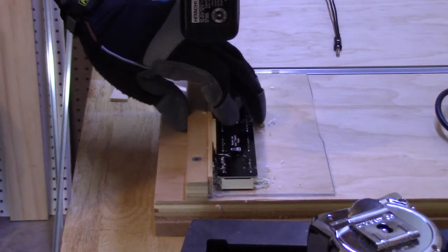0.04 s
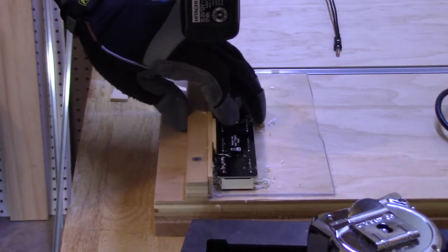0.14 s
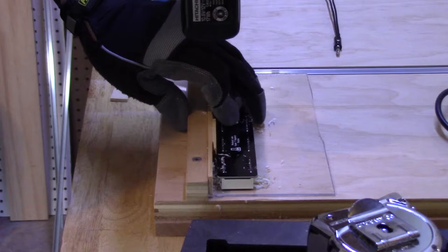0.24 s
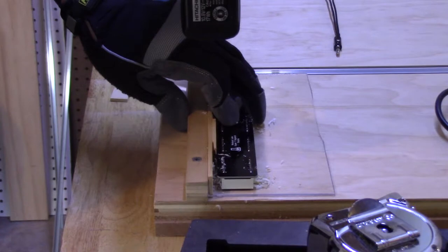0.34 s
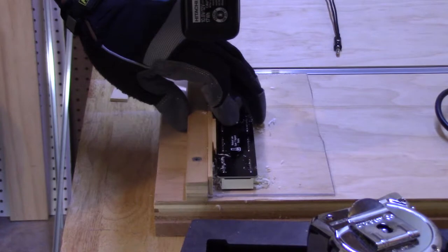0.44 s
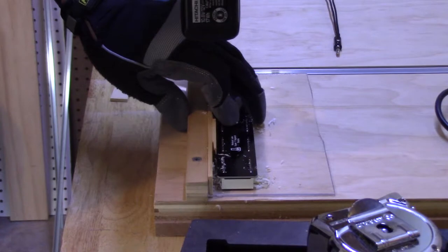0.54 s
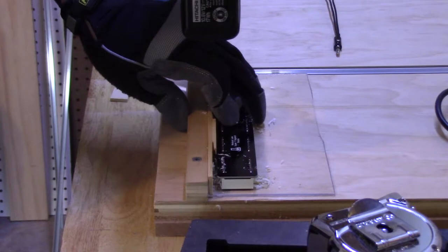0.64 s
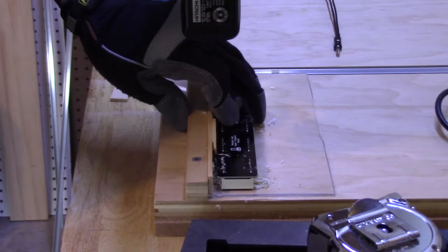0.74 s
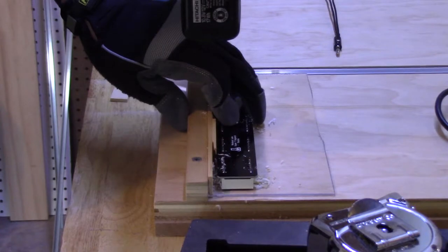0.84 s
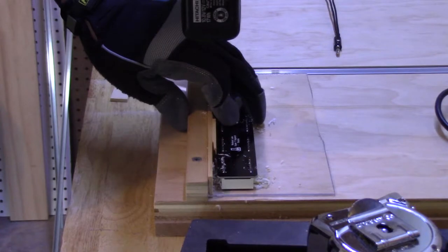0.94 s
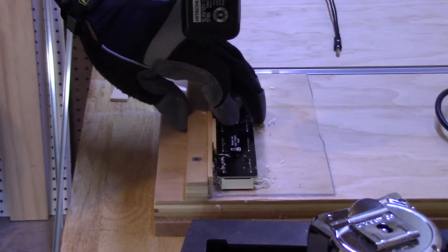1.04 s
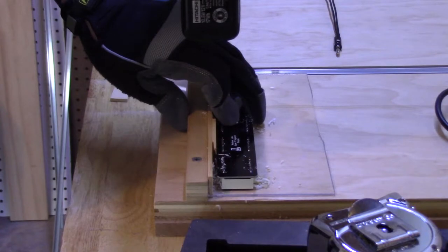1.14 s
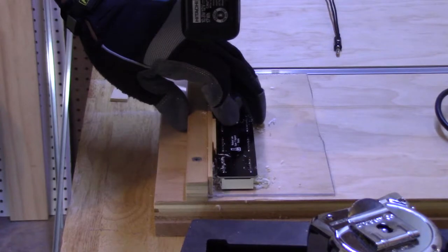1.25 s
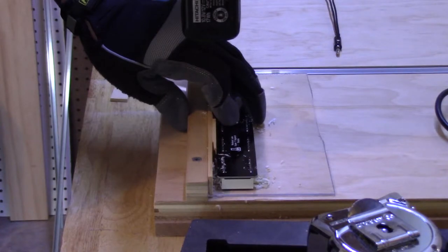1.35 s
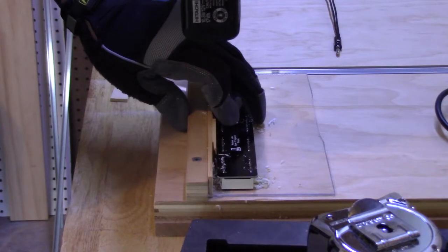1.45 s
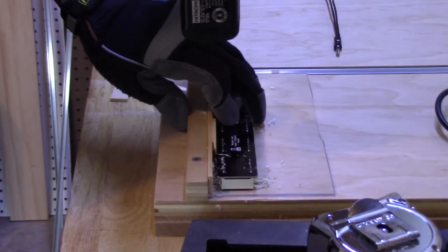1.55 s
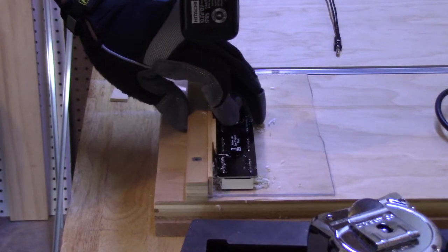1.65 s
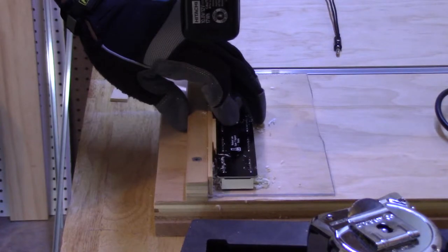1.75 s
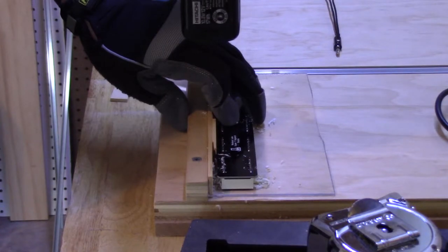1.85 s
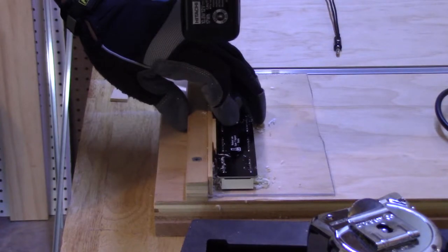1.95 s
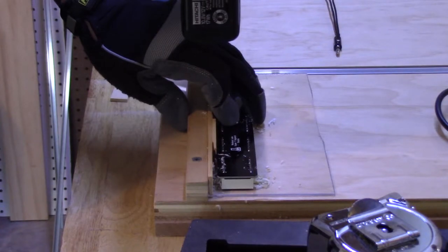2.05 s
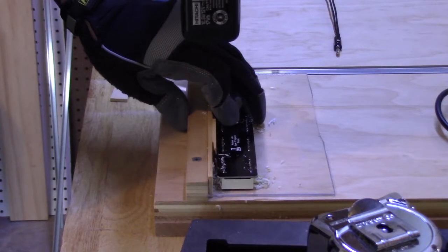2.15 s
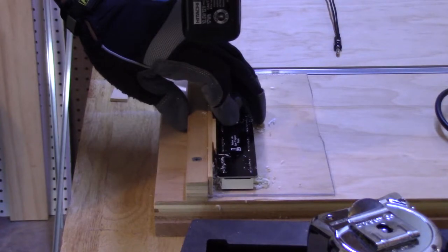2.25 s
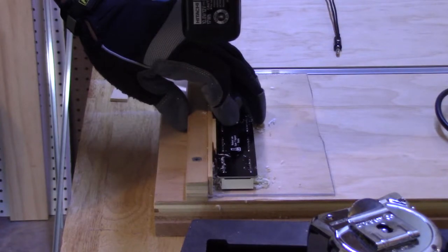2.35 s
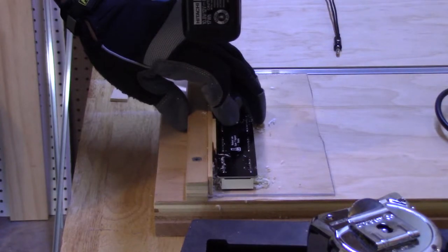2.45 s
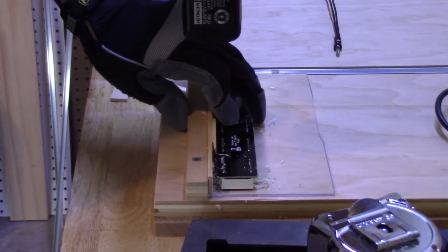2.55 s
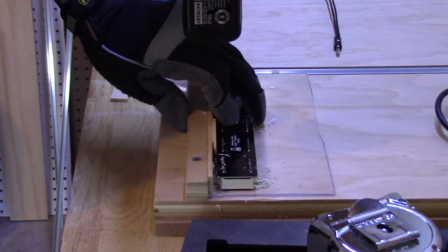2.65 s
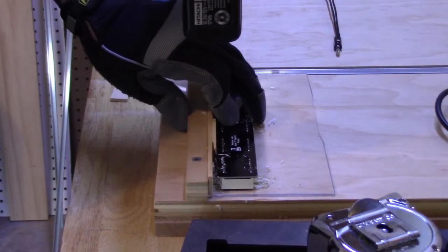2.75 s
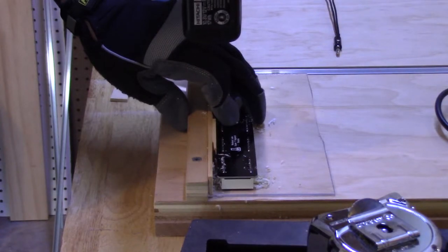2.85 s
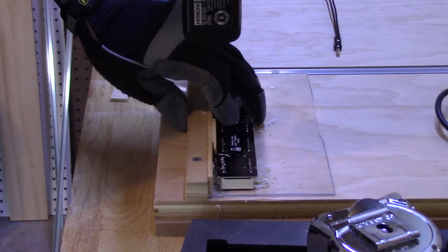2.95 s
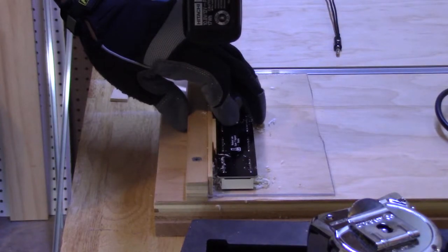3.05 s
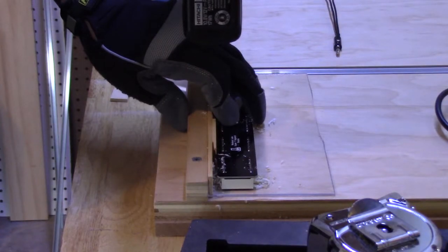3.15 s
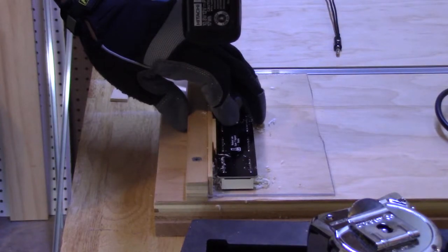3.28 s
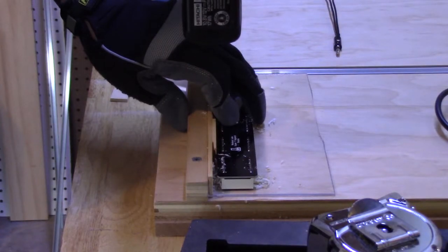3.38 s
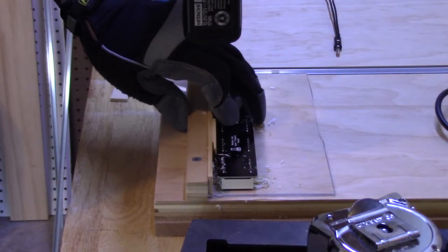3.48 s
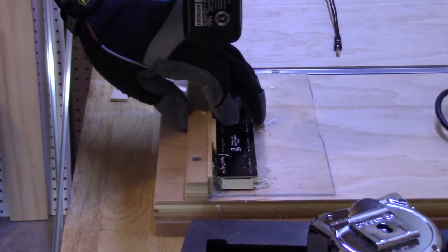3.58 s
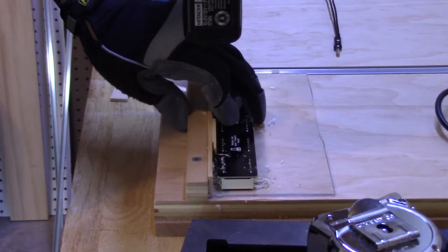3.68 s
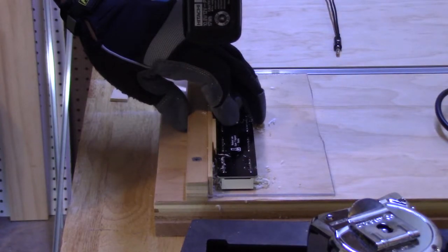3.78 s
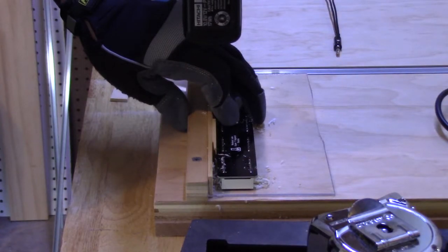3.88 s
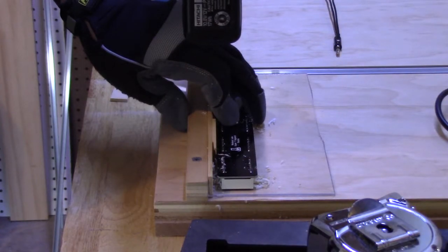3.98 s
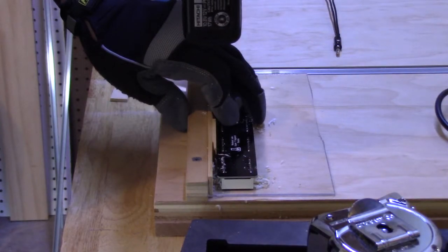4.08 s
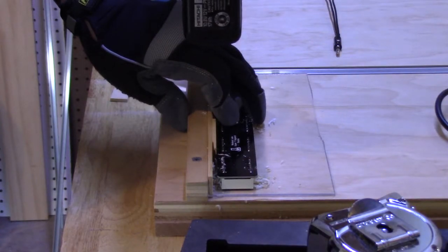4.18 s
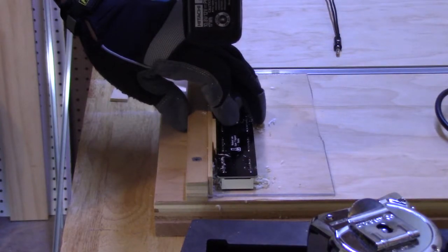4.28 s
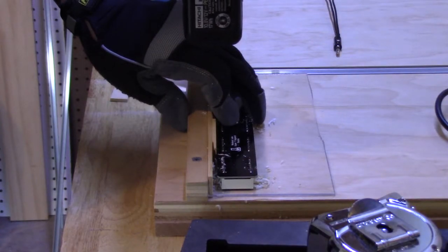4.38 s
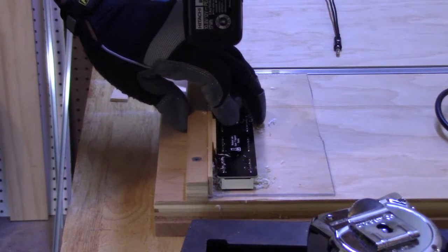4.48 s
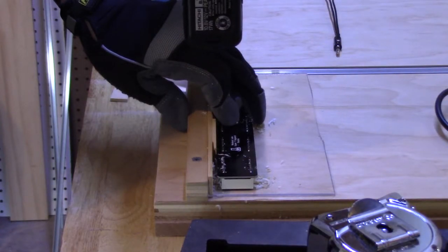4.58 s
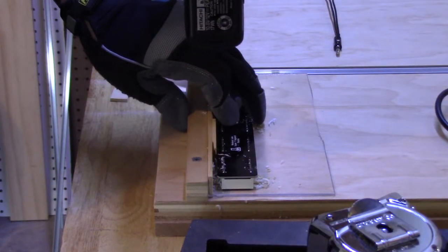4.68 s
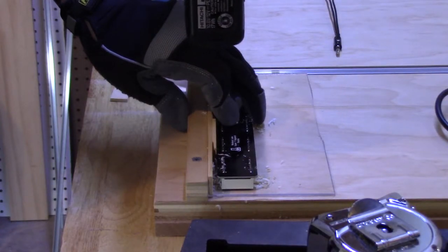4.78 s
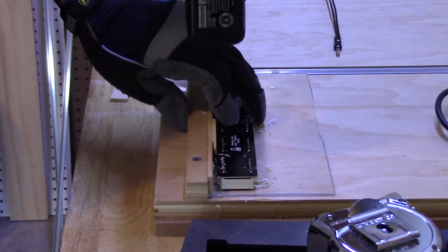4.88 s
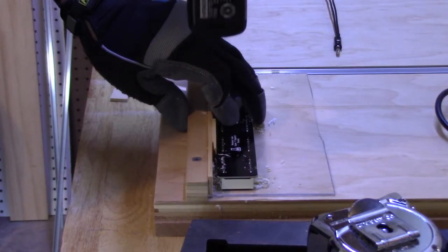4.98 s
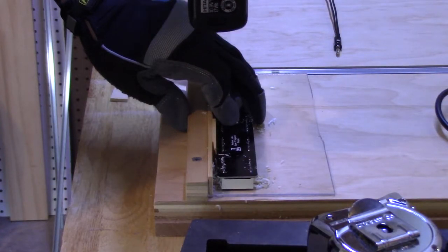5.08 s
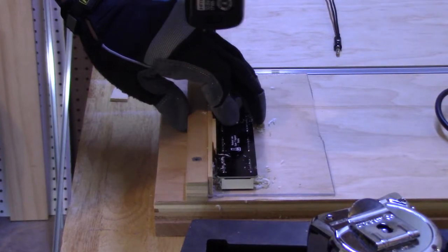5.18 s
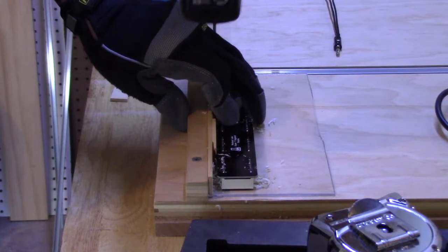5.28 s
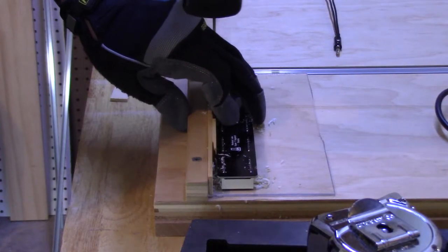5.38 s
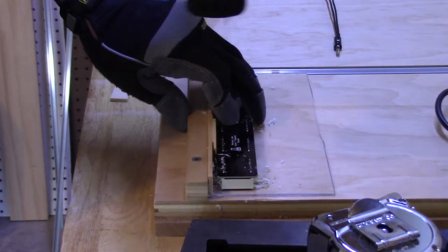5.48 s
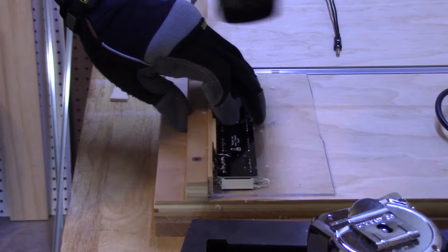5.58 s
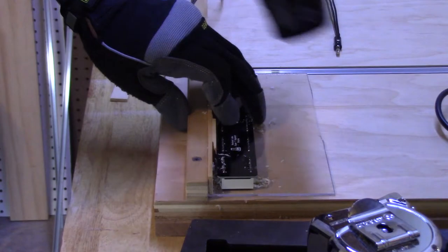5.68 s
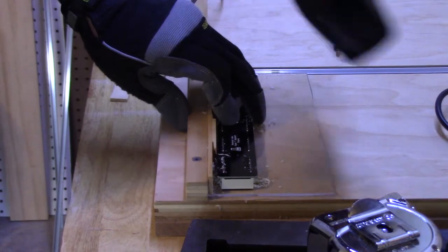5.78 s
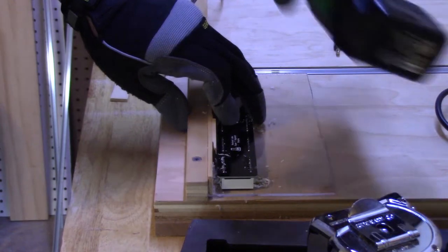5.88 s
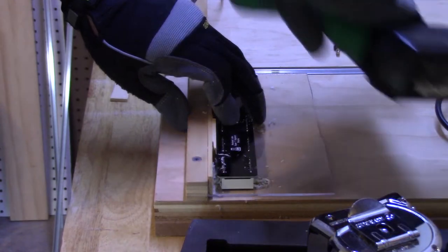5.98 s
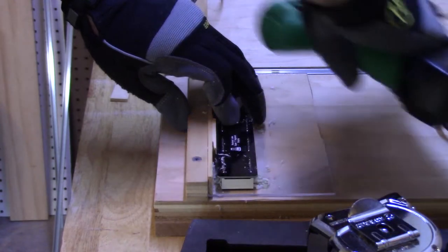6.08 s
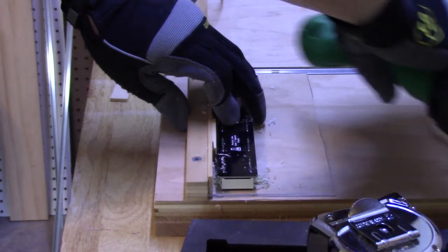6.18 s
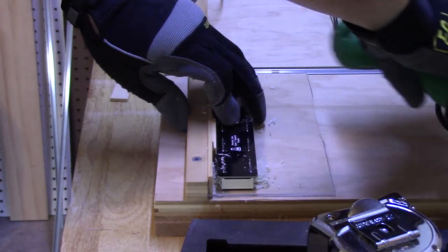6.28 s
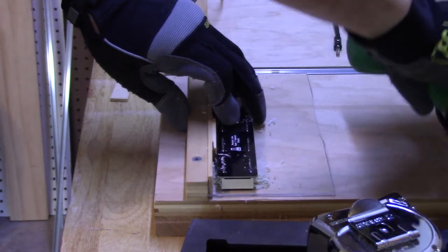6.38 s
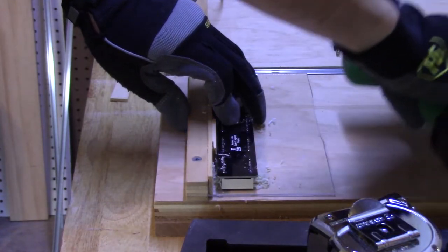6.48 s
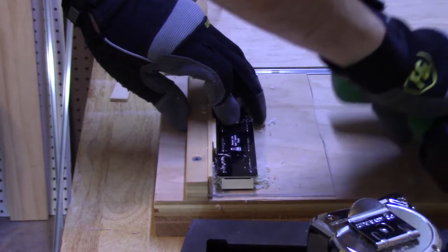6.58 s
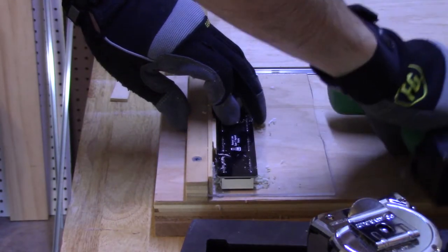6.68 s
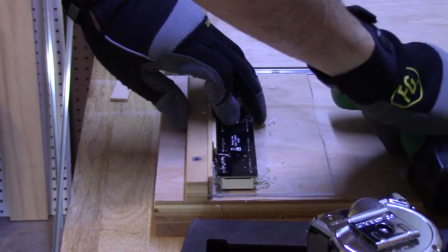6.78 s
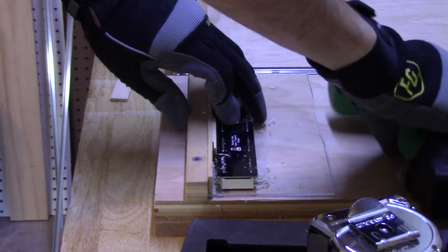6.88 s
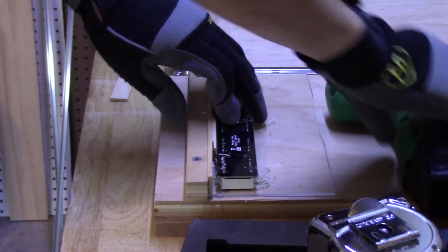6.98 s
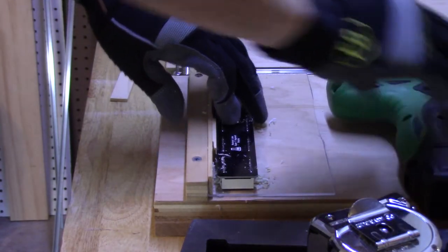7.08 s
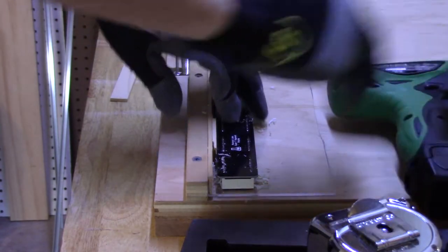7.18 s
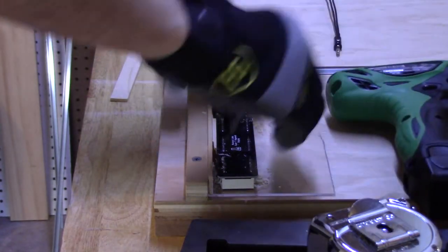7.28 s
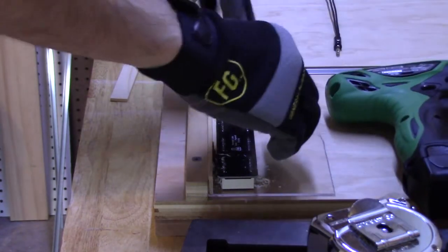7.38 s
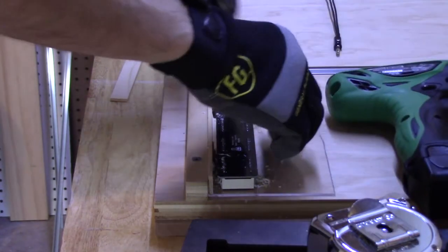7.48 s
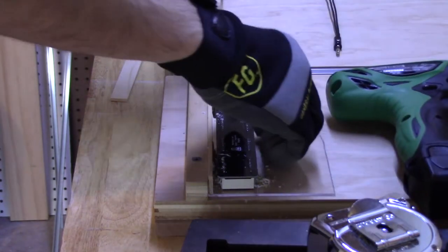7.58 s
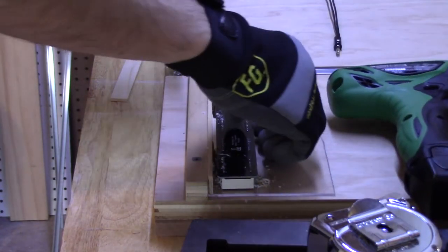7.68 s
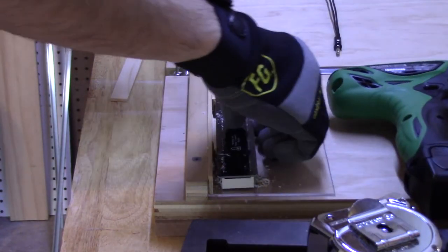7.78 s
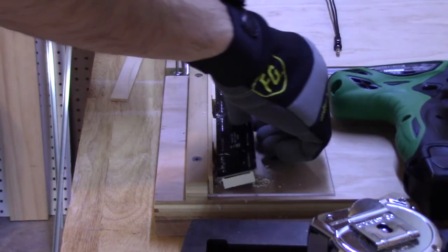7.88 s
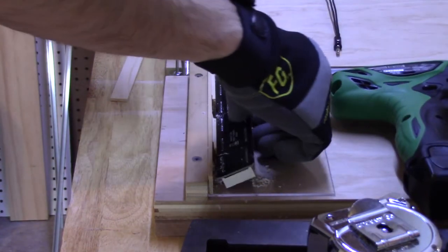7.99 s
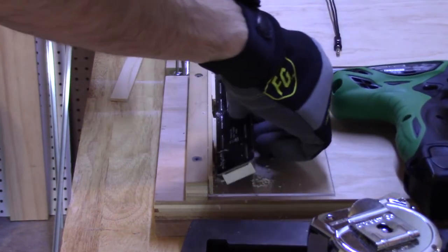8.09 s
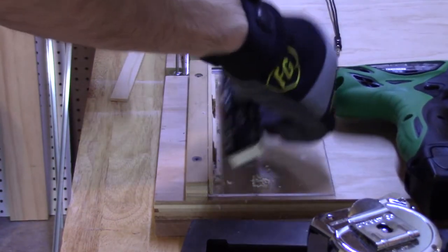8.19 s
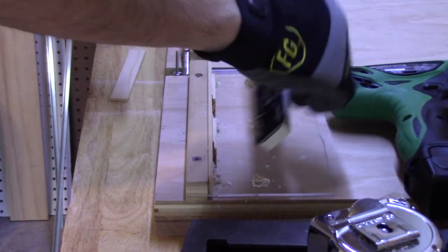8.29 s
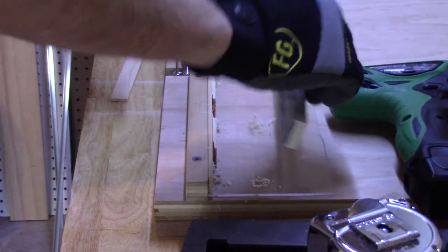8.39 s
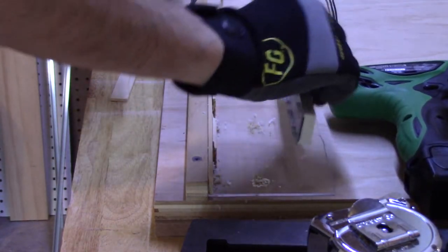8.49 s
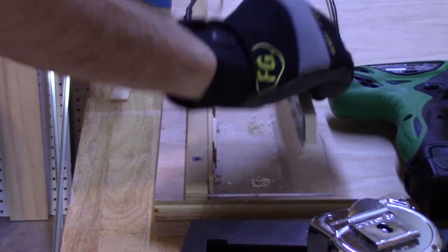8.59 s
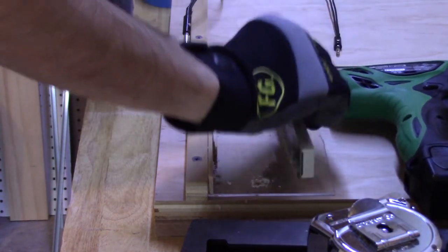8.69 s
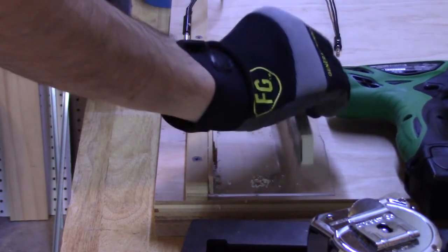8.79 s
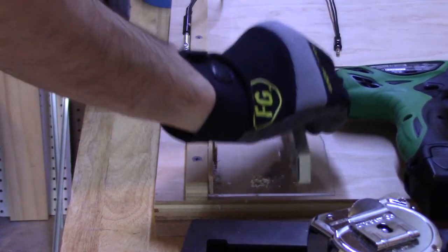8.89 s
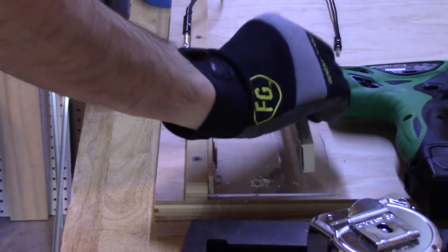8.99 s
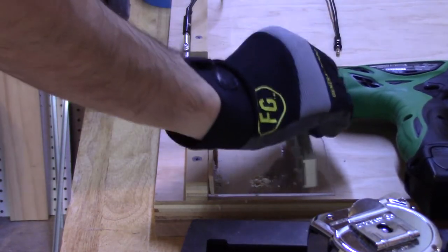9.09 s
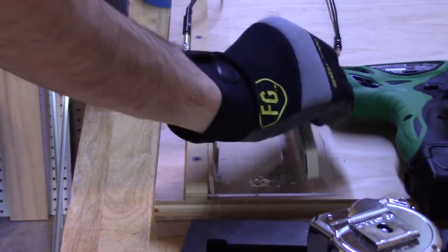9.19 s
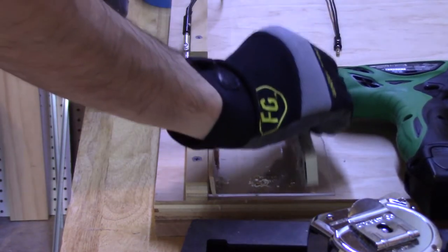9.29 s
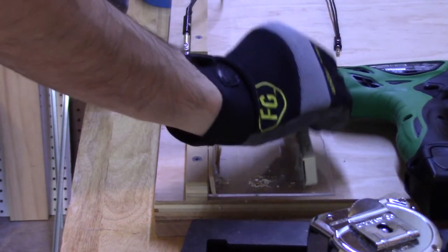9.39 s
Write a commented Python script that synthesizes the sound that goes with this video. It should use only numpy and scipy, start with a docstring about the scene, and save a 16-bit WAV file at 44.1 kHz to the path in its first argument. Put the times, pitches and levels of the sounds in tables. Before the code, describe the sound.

A cordless drill whines steadily through a plastic sheet, jolts through and stops dead, then is laid down with clatter before sharp raps on the bench.

```python
"""A cordless drill bores through a small board on a plastic sheet over a wooden bench in a hard-walled workshop:
speed-locked gear tones, noise that repeats each turn, bites that ring the work. The bit breaks through and
the motor brakes; the drill rattles (ringing loose parts), gloved hands rustle (grainy noise), the drill is laid
down (struck modes), a glove squeaks, and the board is lifted and its edge rapped on the sheet to shake out chips."""
import sys
import numpy as np
from scipy import signal
from scipy.fft import rfft, irfft, next_fast_len
from scipy.io import wavfile

SR = 44100
rng = np.random.default_rng(int(sys.argv[2]) if len(sys.argv) > 2 else 0)


def int16_out(signal):
    """Quantize to a 16-bit WAV file."""
    q = np.round(np.clip(np.atleast_2d(signal).T, -1, 1) * 32767)
    wavfile.write(sys.argv[1], SR, q.astype(np.int16))


N = 416304
TIME = np.arange(N) / SR
CONTACTS_PER_TURN = 144
BITE_TURN = .6   # place in the turn
BITES_IN_S, DEEPENS_S, FREES_S = [.85, 1.15], [2.3, 2.6], [4.3, 4.8]   # load comes on in two steps, goes off

# bench modes: pitch_hz, level_db, t60_s
BENCH_MODES = [(102.6, -8, .09), (205, -3, .07), (252, -2, .07), (305, -1, .06), (350, -3, .06),
               (400, -2, .05), (440, -4, .05), (535, -6, .06)]
# plastic sheet and casing modes: pitch_hz, level_db, t60_s
SHEET_MODES = [(520, 0, .022), (650, 2, .022), (800, 3, .022), (955, 0, .02), (1080, 0, .02),
               (1150, -2, .024), (1260, -1, .018), (1450, -1, .012), (1730, -2, .01), (2100, -5, .008),
               (2500, -6, .006)]


def from_db(db):
    """Gain of a level."""
    return 10 ** (np.asarray(db) / 20)


def rms_one(x):
    """Scale to unit rms."""
    return x / np.sqrt(np.mean(x ** 2) + 1e-20)


def in_time(rows):
    """Columns of a curve at every sample."""
    s, *columns = np.transpose(rows)
    return [np.interp(TIME, s, c) for c in columns]


def at_hz(points, hz):
    """Table value on a log-frequency axis."""
    table = np.array(points)
    return np.interp(np.log(hz + 0.0011), np.log(table[:, 0]), table[:, 1])


def ramp(span_s):
    """0 before the span, 1 after it, linear between."""
    return np.clip((TIME - span_s[0]) / (span_s[1] - span_s[0]), 0, 1)


def gate(start_s, length_s, attack_s, release_s):
    """Attack, hold, release."""
    end_s = start_s + length_s
    return ramp([start_s, start_s + attack_s]) * (1 - ramp([end_s, end_s + release_s]))


def highpass(order, hz):
    """Butterworth high-pass sections."""
    return signal.butter(order, hz, "high", fs=SR, output="sos")


def shaped(x, gain):
    """Filter by a gain that is a function of frequency."""
    size = next_fast_len(x.shape[-1])
    spectrum = rfft(x, size) * gain(np.fft.rfftfreq(size, 1 / SR))
    return irfft(spectrum, size)[..., :x.shape[-1]]


def coloured(x, spectrum):
    """Input filtered by a level table; rms 1."""
    return rms_one(shaped(x, lambda hz: from_db(at_hz(spectrum, hz))))


def drift(rate_hz, count=1):
    """Slow random curves of spread about 1, one per row: straight lines between random knots."""
    knots_s = np.arange(0, N / SR + 2 / rate_hz, 1 / rate_hz)
    heights = rng.standard_normal((count, len(knots_s)))
    return np.array([np.interp(TIME, knots_s, row) for row in heights]) * np.sqrt(1.5)


def struck(times_s, blow_db, modes, contact_s, free_hz=None, grip_db=0, sign=1):
    """Short contacts ring damped modes, each with random strength; a grip damps modes away from free_hz."""
    spread_db = 1.8
    at, out = np.round(np.asarray(times_s) * SR).astype(int), np.zeros(N)
    luck_db = rng.normal(0, spread_db, (len(at), len(modes)))
    contact = np.hanning(int(contact_s * SR) + 3)[1:-1]
    for k, (hz, level_db, t60_s) in enumerate(modes):
        clicks = np.full(N, 1e-18)
        grip_loss_db = 0 if free_hz is None else grip_db * np.log2(hz / free_hz) ** 2   # grip_db at one octave
        clicks[at] = sign ** k * from_db(blow_db + level_db + luck_db[:, k] - grip_loss_db)
        r, w = from_db(-60 / (t60_s * SR)), 2 * np.pi * hz / SR
        out += signal.lfilter([0, np.sin(w)], [1, -2 * r * np.cos(w), r * r], clicks)
    return np.convolve(out, contact / contact.sum())[:N]


def cracks(times_s, level_db, decay_s, low_hz, high_hz, rise_s=.00002):
    """Band-limited noise burst at each contact, dying in a few ms."""
    fall, rise = np.exp(-1 / (decay_s * SR)), np.exp(-1 / (rise_s * SR))
    marks = np.zeros(N)
    marks[np.round(np.asarray(times_s) * SR).astype(int)] = from_db(level_db)
    envelope = signal.lfilter([1], [1, -fall], marks + 1e-18)
    envelope = signal.lfilter([1 - rise], [1, -rise], envelope)
    band = signal.butter(2, [low_hz, min(high_hz, .45 * SR)], "band", fs=SR, output="sos")
    return signal.sosfilt(band, envelope * rng.standard_normal(N))


def gear_tones(turns, live, grab):
    """Sines locked to the speed, wavering slowly and wobbling once a turn, plus a tone of motor strain."""
    # gear and motor tones: cycles_per_chuck_turn, light_load_db, middle_load_db, heavy_load_db
    orders = [(12, -40, -40, -39), (15, -48, -47, -49), (16, -41, -39, -42), (22, -54, -47, -41),
              (23, -49, -43, -39), (24, -44, -43, -55), (28, -55, -55, -38), (32, -58, -40, -50),
              (36, -58, -41, -39), (38, -48, -46, -39), (44, -47, -42, -38), (48, -40, -36, -36),
              (68, -52, -42, -44), (96, -43, -41, -38), (100, -45, -45, -45), (104, -50, -46, -42),
              (108, -44, -45, -46), (128, -42, -40, -44), (140, -45, -41, -55), (148, -46, -41, -42),
              (156, -62, -50, -42), (180, -47, -41, -39), (188, -44, -50, -42), (224, -53, -49, -46),
              (240, -48, -44, -46), (280, -46, -50, -55), (284, -48, -46, -44), (288, -45, -43, -37),
              (320, -47, -50, -54), (324, -51, -49, -48), (336, -46, -41, -41), (384, -48, -48, -48),
              (416, -45, -43, -40), (420, -49, -49, -49), (432, -45, -44, -44), (464, -51, -50, -50),
              (496, -54, -52, -50), (512, -49, -50, -51), (576, -46, -48, -51), (608, -49, -47, -46),
              (624, -48, -45, -43), (640, -56, -52, -50), (656, -48, -47, -47), (688, -55, -53, -52),
              (720, -53, -52, -52), (784, -57, -54, -52), (832, -55, -53, -52)]
    waver_db, throb, low_order = 1.5, .35, 70
    engage_s, release_s, coast_loss_db = [.1, .32], [5.06, 5.13], 12   # gears load; trigger let go, gears unload
    slack_s, slack_loss_db = [4.1, 4.4], 7   # low tones break up once the bit starts to grab
    strain_order, strain_db = 48, [-32, -32, -25]   # spinning up, grabbed, braking
    spun_up_s, braking_s = [.14, .27], [5.165, 5.175]
    load = ((ramp(BITES_IN_S) + ramp(DEEPENS_S)) * (1 - ramp(FREES_S)))[:live]
    angle = 2 * np.pi * turns[:live]
    waver = from_db(waver_db * drift(5.0, count=11)[:, :live])
    slack_db = slack_loss_db * ramp(slack_s)[:live]
    start = 2 * np.pi * rng.random((len(orders), 2))
    tones = np.zeros(N)
    for k, (order, *by_load_db) in enumerate(orders):
        low = order < low_order
        level = from_db(np.interp(load, range(3), by_load_db) - slack_db * low) * waver[k % 11]
        throbbing = 1 + throb * low * np.cos(angle + start[k, 1])
        wobble = 0.00063 * order * np.sin(angle + start[k, 1])
        tones[:live] += level * throbbing * np.sin(order * angle + start[k, 0] + wobble)
    tones *= ramp(engage_s) * from_db(-coast_loss_db * ramp(release_s))
    strain = from_db(strain_db) @ [1 - ramp(spun_up_s), grab, ramp(braking_s)]
    return np.sqrt(2) * (tones + strain * np.sin(2 * np.pi * strain_order * turns))


def mesh_whine(turns, white):
    """Tooth-contact tone of the first gear; uneven teeth shake its amplitude and phase."""
    # whine: time_s, level_db
    whine = [(.2, -36), (.33, -27), (.52, -30.5), (.72, -23), (.9, -30), (1.0, -27), (1.2, -29.5),
             (1.42, -37), (1.7, -31.5), (2.2, -27.5), (2.35, -27.5), (2.6, -26.5), (3.1, -28.5),
             (3.25, -31), (3.45, -27.5), (3.9, -31.5), (4.1, -36), (4.3, -33), (4.45, -39), (4.63, -29.5),
             (4.69, -32), (4.74, -28.5), (4.8, -32), (4.94, -25.5), (5.05, -29), (5.15, -32)]
    flutter, freed_flutter, flutter_top_hz = .24, .35, 220   # depth, depth added once the load is off
    bite_swell_db, bite_width_turns = 2.5, 0.07

    def slow(x):
        return rms_one(shaped(x, lambda hz: (hz > 8) / (1 + (hz / flutter_top_hz) ** 4)))

    angle = 2 * np.pi * CONTACTS_PER_TURN * turns
    depth = flutter + freed_flutter * ramp(FREES_S)
    from_bite_turns = (turns - BITE_TURN - .02 + .5) % 1 - .5
    loaded = ramp(BITES_IN_S) * (1 - ramp(FREES_S))
    swell_db = bite_swell_db * loaded * np.exp(-(from_bite_turns / bite_width_turns) ** 2)
    shaken = (1 + depth * slow(white)) * np.sin(angle) + depth * slow(rng.standard_normal(N)) * np.cos(angle)
    return np.sqrt(2) * from_db(in_time(whine)[0] + swell_db) * shaken


def tooth_noise(turns):
    """White noise partly repeating each turn as the same teeth meet; the pattern is slowly renewed."""
    # part of the noise power that repeats on every turn: pitch_hz, share
    repeats = [(100, 0.35), (400, 0.3), (1500, 0.2), (3000, .35), (8000, 0.15), (14000, 0.05)]
    size, renewal_turns = 2700, 7.025
    patterns = rng.standard_normal((40, size))
    slot, age = (turns % 1 * size).astype(int), turns / renewal_turns
    older, blend = age.astype(int) % 39, age % 1 * np.pi / 2
    teeth = np.cos(blend) * patterns[older, slot] + np.sin(blend) * patterns[older + 1, slot]

    def share(hz):
        return np.clip(at_hz(repeats, hz), 0, 1)

    repeating = shaped(teeth, lambda hz: np.sqrt(share(hz)))
    return repeating + shaped(rng.standard_normal(N), lambda hz: np.sqrt(1 - share(hz)))


def body_noise(white):
    """Gear, brush and fan noise through the housing resonances, rebalanced as body, bench rumble and hiss."""
    # running drill: time_s, body_db, rumble_re_body_db (grows with the push on the bit)
    running_levels = [(0, -29, -9), (.25, -27.5, -13), (1.1, -28, -12), (1.7, -27.5, -8.5), (3.6, -27, -11),
                      (4.5, -25.5, -7), (4.85, -26.5, -14.5), (5.19, -25.5, -28)]
    # noise spectrum: pitch_hz, level_db_per_hz
    housing = [(35, -71), (60, -100), (227, -12), (315, -20), (607, -13), (968, -12.5), (1660, -11),
               (2000, -14.5), (2350, -5.5), (2710, -13), (4030, -15), (4750, -10.5), (12100, -13),
               (14600, -20.5), (16000, -50)]
    # housing resonances: pitch_hz, width_hz, gain_db
    housing_peaks = [(770, 77, 6.5), (1790, 270, 2), (3180, 160, 6), (4770, 270, 4.5), (5670, 170, 8),
                     (6230, 280, 3), (7120, 360, 3.5), (9900, 3000, 2.5)]
    fan_hiss_db = -3   # re body
    body_db, rumble_db = in_time(running_levels)

    def peaks(hz):
        return from_db(sum(db / (1 + (2 * (hz - centre) / width) ** 2) for centre, width, db in housing_peaks))

    noise = coloured(shaped(white, peaks), housing)
    rumble = shaped(noise, lambda hz: 1 / (1 + (hz / 400) ** 6))
    hiss = shaped(noise, lambda hz: 1 / (1 + (4000 / (hz + 1)) ** 6))
    body = rms_one(noise - rumble - hiss)
    mix = body + from_db(rumble_db) * rms_one(rumble) + from_db(fan_hiss_db) * rms_one(hiss)
    return from_db(body_db) * mix


def bit_bites(turns, white, running, live, grab):
    """Once a turn the edge bites: work and bench ring, the bench lurches, the edge chatters in the hole."""
    # what a bite rings in work and bench: pitch_hz, level_db, t60_s
    work = [(108, -8.5, 0.13), (250, -13, 0.02), (1700, 7, 0.011), (2500, 14, 0.02), (3300, 5, 0.009),
            (4390, 6, 0.0088), (6480, 10, 0.015)]
    base_db, spread_db, grab_gain_db, grab_lurch_db = -30, 0.5, 0.5, -21
    cut_ends_s, idle_loss_db = [4.72, 4.9], 9   # the edge runs out of plastic
    chatter_db, chatter_turn, chatter_peaking = 1, .7, 2.0   # level re bite; place in the turn
    bite_db = base_db + grab_gain_db * grab - idle_loss_db * ramp(cut_ends_s) + spread_db * drift(9.0)[0]
    at = np.flatnonzero(np.diff((turns[:live] - BITE_TURN) // 1))
    bites = struck(at / SR, bite_db[at], work, .00005)
    lurch_db = grab_lurch_db + 20 * np.log10(grab[at] + 1e-9)
    lurches = struck(at / SR, lurch_db, BENCH_MODES[:1], 0.0016)

    def wall(hz):
        return 1 / (1 + ((hz - 3120) / 330) ** 4) + 0.41 / (1 + ((hz - 2000) / 600) ** 4)

    swell = np.exp(chatter_peaking * (np.cos(2 * np.pi * (turns - chatter_turn)) - 1))
    chatter = rms_one(shaped(white, wall)) * swell
    return bites + running * from_db(bite_db + chatter_db) * chatter, lurches


def drill():
    """Gear tones, body noise and bites, all driven by one motor speed until the brake."""
    # speed (spins up, sags under load, recovers, brakes): time_s, first_gear_contacts_per_s
    speed = [(0, 1850), (.09, 1890), (.17, 2250), (.25, 2440), (.5, 2445), (1.1, 2438), (1.85, 2411),
             (2.6, 2398), (3.2, 2399), (3.8, 2389), (4.64, 2388), (4.74, 2428), (5.0, 2445), (5.165, 2450),
             (5.2, 1500)]
    stop_s, brake_s = 5.198, .012
    grab_s, grab_width_s = 4.45, 0.34   # near the far side the bit grabs
    grab = np.exp(-((TIME - grab_s) / grab_width_s) ** 2)
    turns = np.cumsum(in_time(speed)[0]) / SR / CONTACTS_PER_TURN
    running = np.clip((stop_s - TIME) / brake_s, 0, 1)
    live = int(stop_s * SR) + 1
    white = tooth_noise(turns)
    tones = running * (gear_tones(turns, live, grab) + mesh_whine(turns, white))
    bites, lurches = bit_bites(turns, white, running, live, grab)
    return tones, running * body_noise(white) + lurches, bites


def hum():
    """A low hum swells and fades: noise in one narrow resonance."""
    # hum: time_s, level_db
    hum_level = [(0, -54.5), (5.2, -54), (5.4, -52), (6.4, -63), (9.44, -62)]
    centre_hz, width_hz = 148.3, 4.9
    narrow = shaped(rng.standard_normal(N), lambda hz: 1 / (1 + (2 * (hz - centre_hz) / width_hz) ** 2))
    return from_db(in_time(hum_level)[0]) * rms_one(narrow)


def room_air():
    """Two channels of room tone: steady coloured noise."""
    # room tone spectrum: pitch_hz, level_db_per_hz
    air_spectrum = [(15, -33), (25, -2), (76, -2.5), (170, 0.5), (344, -3), (887, -2.5), (1230, -10),
                    (1560, -9), (2110, -21), (2350, -15.5), (2760, -21), (10400, -31.5), (16000, -46)]
    air_db = -51
    return from_db(air_db) * coloured(rng.standard_normal((2, N)), air_spectrum)


def groans():
    """Wavering sines: the bench groans as the bit binds, breaks through, and the drill rocks to rest."""
    # groans: start_s, length_s, pitch_hz, level_db
    groan_rows = [(4.383, 0.078, 246, -32), (4.982, 0.057, 206.3, -25), (6.94, 0.026, 242.3, -36)]
    edge_s = 0.022
    waver, out = 1 + 0.0316 * drift(30)[0], 0
    for s, length_s, hz, db in groan_rows:
        tone = np.sin(2 * np.pi * np.cumsum(hz * waver) / SR)
        out = out + from_db(db) * np.sqrt(2) * gate(s, length_s, edge_s, 3 * edge_s) * tone
    return out


def thuds():
    """Heavy blows ring the bench, crack, and leave the sheet rattling in loose, fading touches."""
    # break-through, brake, drill laid down, board shifted:
    # start_s, bench_db, sheet_and_casing_db, crack_db, crack_top_hz, sheet_freest_pitch_hz
    blows = [(4.982, -22, -30, -5, 7500, 1000), (5.021, -37, -22.5, -4, 8000, 905),
             (5.178, -49, -37, -36, 5300, 650), (5.188, -50, -24, -37, 5300, 1320),
             (6.586, -47, -33, -26.5, 3500, 1220), (6.772, -25, -23.5, -18.5, 5600, 980),
             (6.777, -28, -26.5, -40, 3000, 1000), (6.781, -24, -29, -40, 3000, 1090),
             (6.793, -29, -25, -31, 3000, 1350), (6.899, -24, -37, -46, 3000, 1100),
             (6.938, -22.5, -42, -33, 4000, 600), (6.95, -23, -36.5, -50, 3000, 600),
             (6.978, -30, -44, -46, 3000, 800), (7.886, -43, -60, -60, 3000, 900),
             (7.93, -43, -60, -59, 3000, 900), (8.139, -47, -55, -25, 4050, 900)]
    grip_db, rattle_s, rattle_loss_db = 6, 0.017, 21   # loss at one octave; span, loss over it
    s, bench_db, sheet_db, _, _, free_hz = np.transpose(blows)
    sharp = sum(cracks([at], db, 0.0035, 1260, top_hz, rise_s=0.00064) for at, _, _, db, top_hz, _ in blows)
    late = rng.random((len(s), 4)) * [0, 1, 1, 1]   # the blow, then three touches
    touch_s = (s[:, None] + rattle_s * late).ravel()
    touch_db = (sheet_db[:, None] - rattle_loss_db * late).ravel()
    rattle = struck(touch_s, touch_db, SHEET_MODES, 0.00031, np.repeat(free_hz, 4), grip_db)
    return struck(s, bench_db, BENCH_MODES, 0.002) + rattle + sharp


def ticks():
    """Small hard parts knock together: short rings and a crack."""
    # ticks: start_s, level_db
    tick_rows = [(5.534, -37.5), (5.669, -33), (5.7543, -48), (5.8296, -46), (5.858, -36), (6.259, -48),
                 (6.3145, -35), (6.34, -37), (6.3843, -36), (6.4063, -41), (6.458, -35), (6.5024, -37),
                 (6.5287, -37), (6.562, -34), (6.6154, -34), (6.6645, -35), (6.69, -38), (6.718, -36),
                 (6.746, -31), (7.3094, -45), (7.3894, -43.5), (7.635, -47), (8.379, -45)]
    # loose-part modes: pitch_hz, level_db, t60_s
    loose_modes = [(2370, -17, 0.012), (3230, -15, 0.014), (5100, -7.5, 0.0097), (7200, -17, 0.0037),
                   (10500, -23, .003)]
    crack_db = -6.5   # re tick
    s, level_db = np.transpose(tick_rows)
    return struck(s, level_db, loose_modes, .00003) + cracks(s, level_db + crack_db, 0.0034, 2300, 9500)


def gloves():
    """Fabric drags in dense uneven grains, gated into strokes."""
    # fabric spectrum: pitch_hz, level_db_per_hz
    fabric_spectrum = [(1470, -10), (2500, 1), (3110, -9), (3320, -1), (3830, -14), (4390, -8.5),
                       (4870, -6), (5900, -6.5), (6880, -13), (11100, -16.5), (15000, -27)]
    # strokes: start_s, length_s, level_db, lowest_hz
    strokes = [(5.667, 0.3, -62.5, 1000), (6.776, 0.194, -56.5, 1000), (7.072, 0.13, -55, 3800),
               (7.786, 0.047, -64, 1000), (7.833, 0.13, -56.5, 1500), (8.032, 0.081, -54.5, 1500)]
    attack_s, release_s = 0.0069, 0.025
    grains = rng.standard_normal(N) * from_db(3.0 * drift(140)[0])
    fabric, out = coloured(grains, fabric_spectrum), 0
    for s, length_s, db, low_hz in strokes:
        stroke = signal.sosfilt(highpass(2, low_hz), fabric)
        out = out + from_db(db) * gate(s, length_s, attack_s, release_s) * stroke
    return out


def squeak():
    """A glove squeaks: a short wavering sine."""
    centre_s, length_s, pitch_hz, level_db = 7.185, .05, 4350, -57
    phase = 2 * np.pi * np.cumsum(pitch_hz * (1 + 0.011 * drift(60)[0])) / SR
    return from_db(level_db) * np.exp(-((TIME - centre_s) / length_s * 2) ** 2) * np.sin(phase)


def raps():
    """The board edge hits the sheet: slap, sheet and bench (roomy), board rings and clatter (close)."""
    # raps: start_s, board_db, bench_db, sheet_db, hard_edge_db, freest_pitch_in_grip_hz
    rap_rows = [(8.657, -9, -15.5, -22, 5, 3860), (8.6991, -16, -34, -28, -17, 4870),
                (8.8887, -7, -21.5, -24.5, 4.5, 3540), (9.0656, -2.5, -24.5, -22, 1.5, 3155),
                (9.2443, -2.5, -25.5, -23, 4.5, 3430), (9.3853, -16, -38, -25, -15, 3500),
                (9.4029, -3.5, -24, -25, 9, 2970)]
    # board modes: pitch_hz, level_db, t60_s
    board_modes = [(1830, -2, .008), (2230, -3, .006), (2650, -4, .005), (3180, -4, .006), (3600, -2, .006),
                   (4300, -3, .005), (4750, -4, .006), (5200, -3, .006), (5700, -3, .005)]
    # hard edge modes of the board: pitch_hz, level_db, t60_s
    edge_modes = [(6500, 0, .0015), (8200, -2, .0012), (10500, -5, .001)]
    board_grip_db, bench_grip_db, bench_free_hz = 20, 8, 390   # loss one octave from the freest pitch
    clatter_db, slap_db, slap_t60_s = 6.5, 13, .0012   # levels re board
    bench_lag_s, sheet_lag_s, sheet_contact_s = .004, .003, .0004   # bench and sheet answer late
    s, board_db, bench_db, sheet_db, edge_db, free_hz = np.transpose(rap_rows)
    # successive board modes alternate in sign and gain 7 % each
    board = struck(s, board_db, board_modes, .00003, free_hz, board_grip_db, sign=-1.07)
    edge = struck(s, edge_db, edge_modes, .00003)
    bench = struck(s + bench_lag_s, bench_db, BENCH_MODES, 0.0018, bench_free_hz, bench_grip_db)
    sheet = struck(s + sheet_lag_s, sheet_db, SHEET_MODES, sheet_contact_s)
    slap = sum(struck([at], db + slap_db, [(hz, 0, slap_t60_s)], .00003)
               for at, db, hz in zip(s, board_db, free_hz))
    return slap + bench + sheet, board + edge + cracks(s, board_db + clatter_db, 0.0037, 2100, 5040)


def workshop(x):
    """Convolve with noise that dies band by band, one pattern for the middle and one for the side."""
    # reverberation: pitch_hz, t60_s
    room_t60 = [(100, 0.48), (300, 0.69), (800, 0.94), (2000, 0.71), (5000, 0.3), (9000, 0.16),
                (14000, 0.15)]
    onset_s = 0.0034   # echo fades in around this
    edges_hz = 25 * 2 ** np.arange(0, 9.6, .5)
    t, tail = TIME[:SR], 0
    white = rng.standard_normal((2, SR))
    for low, high in zip(edges_hz, edges_hz[1:]):
        band = signal.sosfilt(signal.butter(1, [low, high], "band", fs=SR, output="sos"), white)
        tail = tail + band * from_db(-60 * t / at_hz(room_t60, np.sqrt(low * high)))
    tail = tail * np.clip(t / onset_s - .5, 0, 1)
    tail = tail / np.sqrt(np.sum(tail ** 2, axis=1, keepdims=True))
    return signal.fftconvolve(x[None], tail, axes=1)[:, :N]


def scene():
    """All sources in the room, heard by two close-set ports as mid plus and minus side."""
    # side gain of echo and arrival difference: pitch_hz, gain_db
    width = [(60, -24), (120, -37), (240, -66), (480, -19), (950, -45), (1890, -17.5), (3770, -16),
             (5500, -20.5), (8000, -5), (15000, -23.5)]
    # room tone: pitch_hz, side_minus_mid_db
    air_width = [(30, -16), (120, -19), (280, -13.5), (600, -14), (1500, -12), (6000, -7), (11000, -23.5),
                 (15000, -29)]
    bass_cut_hz, room_db = 123, -5.5
    tones_in_room_db, close_in_room_db = -22, -11   # these beam at the ports and feed the room less
    tones, noise, bites = drill()
    rings, clatter = raps()
    spread = noise + thuds() + rings + ticks() + gloves() + squeak()
    close = groans() + bites + clatter
    # bench and tools radiate no deep bass
    spread, close, tones = signal.sosfilt(highpass(8, bass_cut_hz), [spread, close, tones])
    to_room = spread + from_db(close_in_room_db) * close + from_db(tones_in_room_db) * tones
    echo, side_echo = workshop(to_room)
    close = close + tones
    air = room_air()
    mid = spread + close + from_db(room_db) * echo + air[0] + hum()
    arrival_gap = np.gradient(close) * 1.1   # close sounds reach one port a little before the other
    side = shaped(from_db(room_db) * side_echo + arrival_gap, lambda hz: from_db(at_hz(width, hz)))
    side = side + shaped(air[1], lambda hz: from_db(at_hz(air_width, hz)))
    return np.array([mid + side, mid - side])


def record(dry):
    """Only the highest peaks are rounded at full scale; deep bass and the top are cut."""
    low_cut_hz, top_cut_hz = 60, 16400
    rounded = dry / (1 + dry ** 6) ** (1 / 6)
    rounded = signal.sosfilt(highpass(3, low_cut_hz), rounded)
    return signal.sosfilt(signal.cheby2(12, 70, top_cut_hz, fs=SR, output="sos"), rounded)


dry = scene()
out = record(dry)
int16_out(out)
```